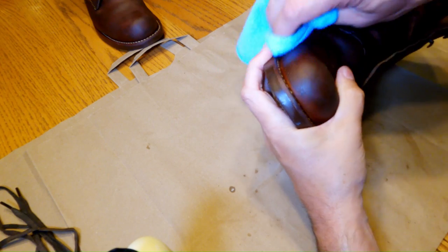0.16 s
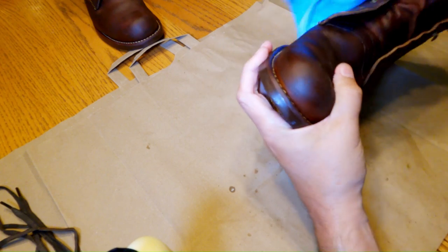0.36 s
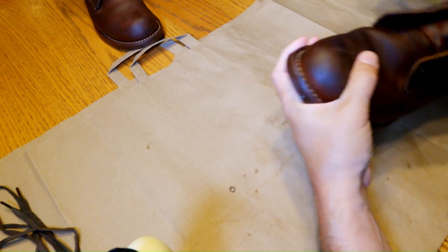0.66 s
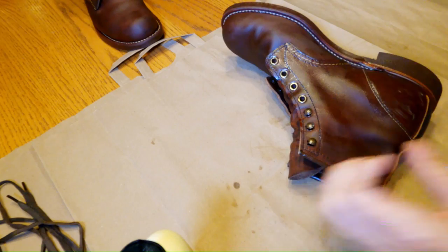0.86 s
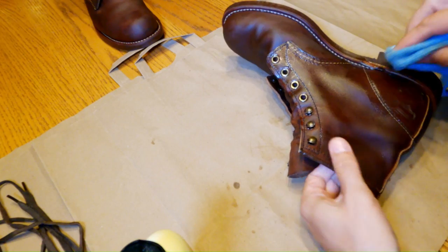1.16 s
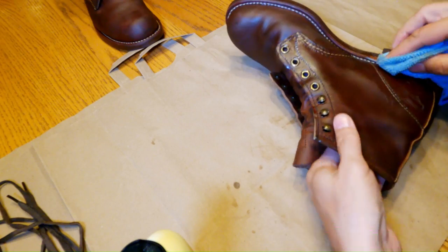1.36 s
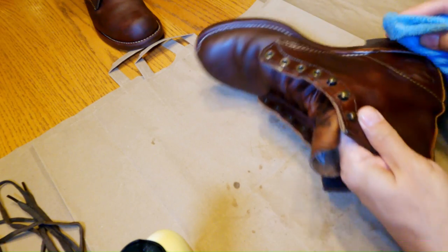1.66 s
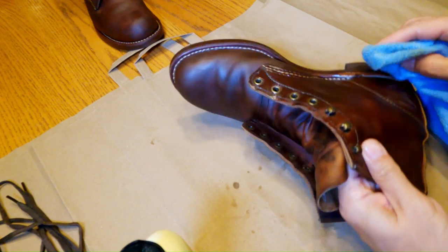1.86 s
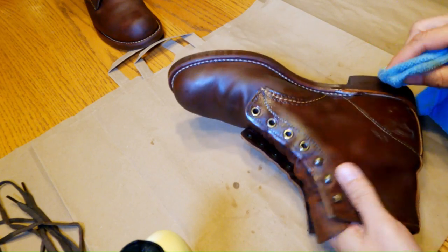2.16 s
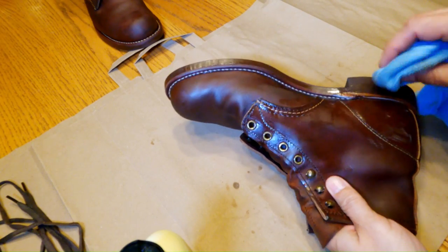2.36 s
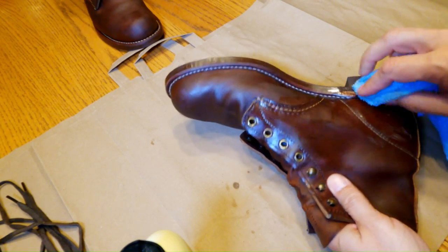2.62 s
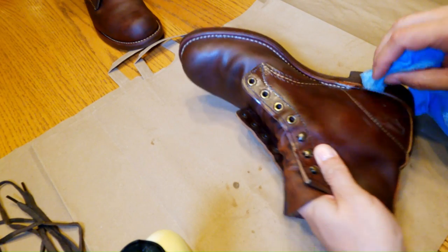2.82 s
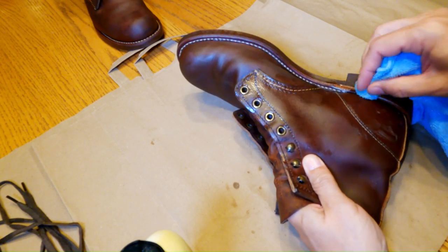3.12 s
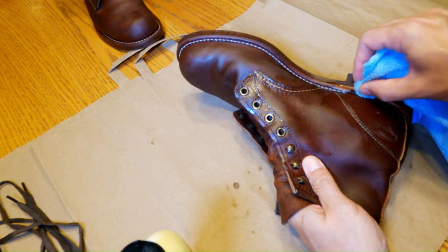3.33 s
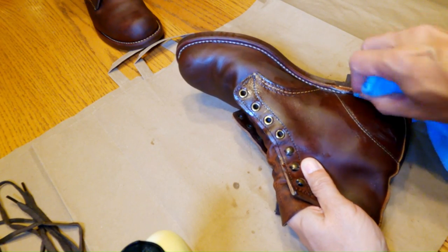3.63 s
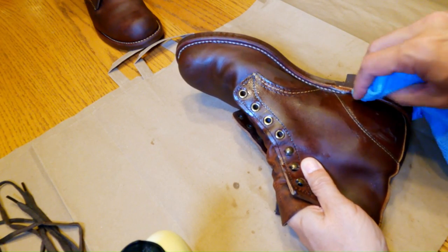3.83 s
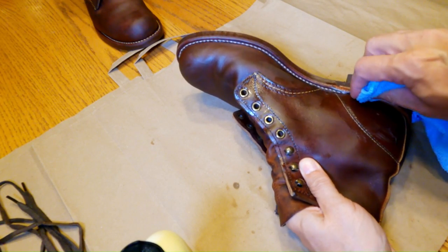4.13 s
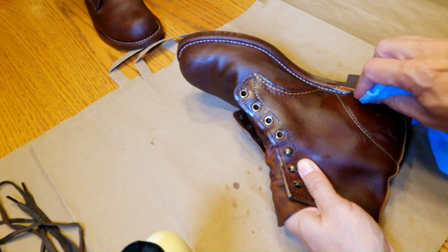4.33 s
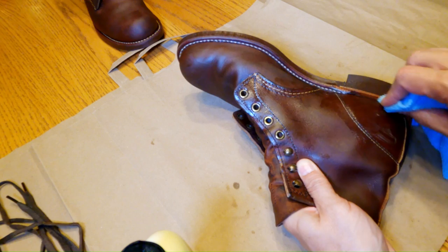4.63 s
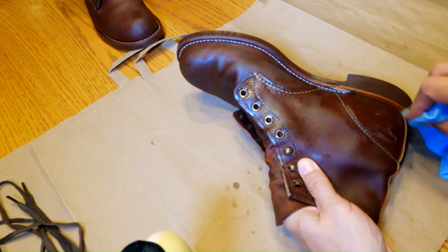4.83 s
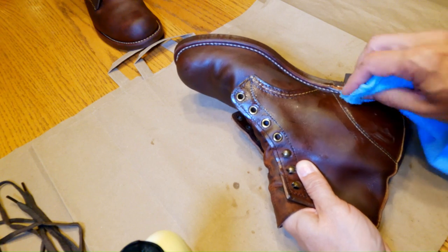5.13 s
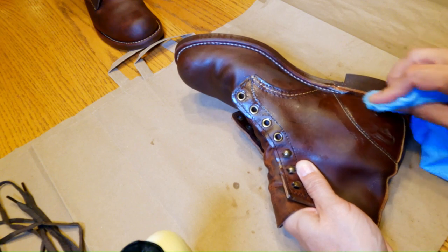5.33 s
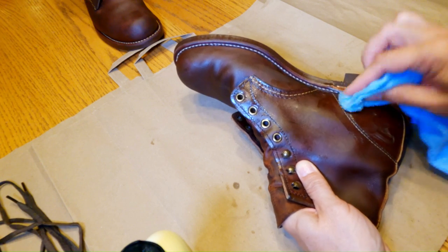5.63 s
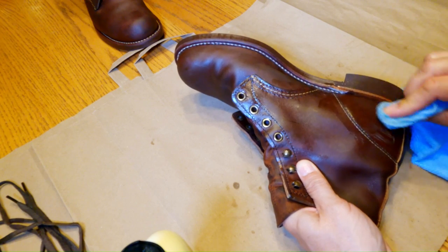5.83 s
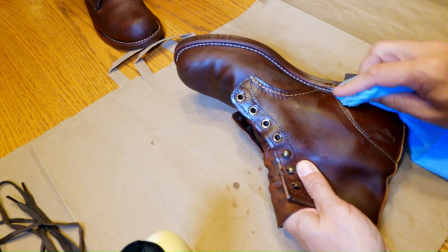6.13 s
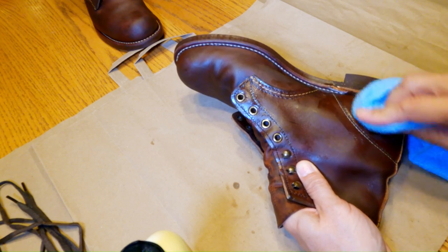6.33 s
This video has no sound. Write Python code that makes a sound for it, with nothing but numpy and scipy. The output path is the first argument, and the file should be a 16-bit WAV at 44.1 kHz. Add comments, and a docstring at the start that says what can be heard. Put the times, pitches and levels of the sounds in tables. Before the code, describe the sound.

Soft cloth wipes on leather, a cut-off thump, papery shoves and scraping with hollow table knocks, then quiet intermittent rubbing.

```python
"""A cloth wipes conditioner into a leather boot on a paper-covered wooden table in a quiet room.
Each wipe swells and dies away as fibres catch and slip; the hollow boot murmurs when the hand bears down.
Taps, dry ticks and groans dot the wipes; at 0.81 s the boot bumps down, and its ring soon stops dead.
Then it is shoved and swung round on the paper, knocks on the table as it rocks, and squeaks faintly.
Softer wipes follow: friction is filtered noise and crackle, blows are decaying sines and noise bursts."""
import sys
import numpy as np
from scipy import signal
from scipy.fft import rfft, irfft
from scipy.io import wavfile
from scipy.ndimage import uniform_filter1d

SR = 44100
rng = np.random.default_rng(int(sys.argv[2]) if len(sys.argv) > 2 else 0)


def pcm_store(signal):
    """Save signal as 16-bit PCM."""
    levels = np.round(np.clip(np.atleast_2d(signal), -1, 1) * 32767)
    wavfile.write(sys.argv[1], SR, levels.astype(np.int16).T)


N = 285674
TIME, HZ = np.arange(N) / SR, np.fft.rfftfreq(N, 1 / SR)  # seconds, Hz
STOP_S = 0.8585  # blows and gestures begun before this moment stop dead here
BEFORE_STOP = TIME < STOP_S


def gain_of(db):
    """Decibels to amplitude."""
    return 10 ** (np.asarray(db) / 20)


def evened(x):
    """Scales to an rms of one."""
    return x / np.sqrt(np.mean(x ** 2) + 1e-20)


def read(points, hz):
    """Reads a curve on a log-frequency axis."""
    f, value = np.transpose(points)
    return np.interp(np.log(hz + 1), np.log(f + 1), value)


def add(mix, s, sound):
    """Mixes a sound in at a given time in seconds."""
    part = mix[..., max(round(s * SR), 0):][..., :sound.shape[-1]]
    part += sound[..., :part.shape[-1]]


def wander(rate_hz):
    """Slow random drift of rms one: noise that weakens above the given rate."""
    lowpass = 1 / (1 + (HZ / rate_hz) ** 2)
    return evened(irfft(rfft(rng.standard_normal(N)) * lowpass, N))


def wavering(length, depth, size=500):
    """A clock in seconds that runs unevenly, so that tones played on it waver."""
    unevenness = evened(uniform_filter1d(rng.standard_normal(length), size))
    return np.cumsum(1 + depth * unevenness) / SR


# How alike left and right are. Each row: frequency in Hz, likeness from 0 to 1.
LIKENESS = [(150, 0.99), (3000, 0.68), (8000, 0.86), (13000, 0.407)]


def coloured(pair, gain, hz=HZ, diffuse=1):
    """Filters two unrelated signals into left and right, sharing less as likeness falls or diffuseness grows."""
    same = read(LIKENESS, hz) ** diffuse
    mid, side = rfft(pair) * gain * np.sqrt([1 + same, 1 - same])
    return evened(irfft([mid + side, mid - side], pair.shape[-1]))


def noise(spectrum, diffuse=1):
    """Smooth stereo noise of a given spectrum."""
    return coloured(rng.standard_normal((2, N)), gain_of(read(spectrum, HZ)), diffuse=diffuse)


def friction(spectrum, slips_per_s, spread_db, smooth, patchy_db):
    """Countless tiny slips of random size; the colour shifts as the contact patch moves."""
    size = gain_of(spread_db * np.minimum(rng.exponential(1, N), 4.5))
    happens = rng.random(N) < slips_per_s / SR
    slips = evened(size * happens * rng.standard_normal((2, N)))
    slips = slips + smooth * rng.standard_normal((2, N))
    # random patches of loud and soft over pitch and time
    z = signal.stft(slips, nperseg=512)[2]
    patches = uniform_filter1d(rng.standard_normal(z.shape[1:]), size=7, axis=0)
    patches = evened(uniform_filter1d(patches, size=9, axis=1))
    slips = signal.istft(z * gain_of(patchy_db * patches), nperseg=512)[1][:, :N]
    return coloured(slips, gain_of(read(spectrum, HZ)))


def gestures(rows, shape, ease_s=0.045):
    """Each gesture gathers speed, sags and dies away, long ones more slowly; gives the gains of two layers."""
    rise, sag_db, fall = shape
    power = np.zeros((2, N))
    for s, length, *db in rows:
        u = (TIME - s) / length
        rise_db = -20 * np.maximum(1 - u / rise, 0) ** 2
        fall_db = -20 * np.maximum(u - 1, 0) / fall
        level = gain_of(rise_db - sag_db * np.clip(u, 0, 1) + fall_db)
        level = uniform_filter1d(level, round(ease_s * SR))  # the hand rounds every start and stop
        same_side = BEFORE_STOP == (s < STOP_S)  # no gesture carries across the dead stop
        power += np.outer(gain_of(db), level * same_side) ** 2
    return np.sqrt(power)


def blows(rows, source):
    """Plays a table of short sounds; those begun before the dead stop are silenced at it."""
    out = np.zeros((2, N))
    silencer = np.clip((STOP_S - TIME) / 0.0015, 0, 1)  # a 1.5 ms fade
    for s, *row in rows:
        sound = source(*row)
        if s < STOP_S:
            sound = sound * silencer[round(s * SR):][:sound.shape[-1]]
        add(out, s, sound)
    return out


# How far the boot slides on the paper. Each row: time in seconds, sliding share of the sound from 0 to 1.
SLIDING = [(0.8, 0.22), (0.95, 1), (2.95, 0.58), (3.15, 0.22)]


def by_contact(held, sliding):
    """Blends the sound of the boot held still with that of the boot sliding, at equal power."""
    share = np.interp(TIME, *np.transpose(SLIDING))
    return np.sqrt(1 - share) * held + np.sqrt(share) * sliding


# Tone of the quiet room. Each row: frequency in Hz, relative density in dB per Hz.
ROOM = [(15, -35.5), (25, 6.5), (81, -22), (154, 0), (235, 0), (480, -16.5), (860, -27.5), (1280, -18),
        (2430, -38.5), (5720, -27), (8550, -37), (12100, -46)]


def room(level_db=-59.5):
    """Steady, widely spread noise of the quiet room."""
    return gain_of(level_db) * noise(ROOM, diffuse=6.1)


# Tone of the held boot's murmur. Each row: frequency in Hz, relative density in dB per Hz.
MURMUR = [(60, -23), (130, -4.5), (220, 7.5), (300, -5), (390, -16), (520, -25.5), (700, -51.5)]
# Tone of the sliding boot's higher murmur. Each row: frequency in Hz, relative density in dB per Hz.
SLIDING_MURMUR = [(60, -10), (130, 2.5), (220, -4), (305, 10.5), (400, -6), (520, -11), (700, -25.5),
                  (1500, -58.5)]
# Tone of the table's rumble. Each row: frequency in Hz, relative density in dB per Hz.
RUMBLE = [(15, -34), (33, 8.5), (52, 5.5), (85, -3), (180, -7), (400, -83)]
# The hand bears down. Each row: start in seconds, length in seconds, level of the hollow boot's murmur
# in dB, level of the table's rumble in dB.
PRESSES = [(-0.1, 0.87, -46.5, -44.5), (1.18, 0.12, -48, -65), (1.32, 0.21, -45.5, -48.5),
           (1.59, 0.083, -40.5, -53.5), (2.26, 0.075, -43, -51), (2.33, 0.13, -58, -53.5),
           (2.76, 0.26, -48, -52), (4.55, 0.34, -48, -82), (5.2, 0.28, -61, -57),
           (5.72, 0.24, -62.5, -64.5), (6.26, 0.14, -63, -51.5)]
# A press, in one row: rise from -20 dB as a share of its length, sag over its length in dB,
# time to fall 20 dB as a share of its length.
PRESS_SHAPE = (0.29, 1, 0.84)


def handling(toe_db=-4, lumpy_db=2.5, lumps_hz=11, rest_murmur_db=-66.5, rest_rumble_db=-75):
    """The dragging hand shakes the hollow boot and the table unevenly; the sliding boot murmurs higher."""
    held = friction(MURMUR, slips_per_s=1000, spread_db=2.0, smooth=0.84, patchy_db=2.5)
    higher = friction(SLIDING_MURMUR, slips_per_s=170, spread_db=0.5, smooth=1.0, patchy_db=4.5)
    pressure, weight = gestures(PRESSES, PRESS_SHAPE)
    toe = gain_of(toe_db) * higher * BEFORE_STOP  # more of the higher murmur before the dead stop
    murmur = (by_contact(held, higher) + toe) * pressure
    resting = held * gain_of(rest_murmur_db)  # light contact between the presses
    rumble = noise(RUMBLE) * np.hypot(weight, gain_of(rest_rumble_db))
    lumps = evened(gain_of(lumpy_db * wander(lumps_hz)))
    return murmur + (resting + rumble) * lumps


# The cloth wipes the leather. Each row: start in seconds, length in seconds, hiss level in dB,
# level in dB of the rasp where it drags.
WIPES = [(0.04, 0.135, -54.5, -61.5), (0.215, 0.072, -57.5, -60.5), (0.39, 0.11, -59.5, -56),
         (3.115, 0.14, -63, -72), (3.47, 0.067, -66, -85), (3.695, 0.12, -66.5, -80.5),
         (4.04, 0.15, -64, -70), (4.19, 0.16, -66, -67), (4.4, 0.29, -56, -61), (4.72, 0.24, -59, -63.5),
         (5.03, 0.087, -68.5, -66), (5.21, 0.086, -64.5, -60), (5.29, 0.19, -56, -61.5),
         (5.685, 0.067, -65, -66.5), (5.79, 0.15, -56, -55), (6.08, 0.085, -65.5, -67.5),
         (6.21, 0.26, -63.5, -62)]
# A wipe, in one row: rise from -20 dB as a share of its length, sag over its length in dB,
# time to fall 20 dB as a share of its length.
WIPE_SHAPE = (0.5, 1.1, 1)


def wipes():
    """Gains of hiss and rasp as the cloth sweeps over the leather."""
    return gestures(WIPES, WIPE_SHAPE)


# Tone of cloth dragging on leather. Each row: frequency in Hz, relative density in dB per Hz.
CLOTH_RASP = [(300, -2.5), (600, -2.5), (860, -9), (1050, -1), (1400, 0.5), (1800, -0.5), (2200, -7.5),
              (3000, -9.5), (5000, -17), (9000, -47)]


def cloth_rasp():
    """Cloth fibres catch and slip on waxed leather."""
    return friction(CLOTH_RASP, slips_per_s=1400, spread_db=1.0, smooth=1.0, patchy_db=1.0)


def crackle(low_hz=1900, high_hz=7500, snags_per_s=200, spread_db=4.0, t60=0.0188, count=16):
    """Fibres and creases snag and let go, each with a brief pitch of its own."""
    t, out = np.arange(1024) / SR, np.zeros((2, N))
    for when, pitch, size, side in rng.random((round(snags_per_s * N / SR), 4)):
        hz = low_hz + (high_hz - low_hz) * pitch
        size_db = -spread_db * np.log(size + 1 / count)  # mostly small, a few large
        grain = gain_of(size_db - 60 * t / t60) * np.sin(2 * np.pi * hz * t)
        add(out, when * N / SR, np.outer([1 + side, 2 - side], grain))
    return evened(out)


# Tone of the rubbing hiss. Each row: frequency in Hz, relative density in dB per Hz.
HISS = [(900, -25), (2000, -10.5), (4000, 0), (5400, -3), (7400, -8.5), (8400, -17.5), (12300, -19)]


def rubbing_hiss(toe_hz=4100, toe_db=3, cloth_crackle=0.24, paper_crackle=0.54):
    """Fine slips and crackle, rougher on paper than with cloth on waxed leather."""
    hiss = friction(HISS, slips_per_s=2000, spread_db=1.0, smooth=0.98, patchy_db=2.0)
    # the first wipes are on the stiff toe cap, which hisses higher: the highpass runs twice
    highpass = signal.butter(2, toe_hz, "high", fs=SR, output="sos").repeat(2, axis=0)
    on_toe = gain_of(toe_db) * signal.sosfilt(highpass, hiss)
    hiss = np.where(BEFORE_STOP, on_toe, hiss)
    return evened(hiss + by_contact(cloth_crackle, paper_crackle) * crackle())


def near_surfaces(pair, echo_db=-9, fade_s=0.015, move_s=0.2):
    """Table, boot and hand throw back early echoes that comb the sound; the comb changes as the hand moves."""
    t, out = np.arange(2048) / SR, pair.copy()
    for pose in range(int(TIME[-1] / move_s) + 2):
        sparse = rng.random((2, len(t))) < 0.05
        left, own = rng.standard_normal((2, len(t))) * sparse * np.exp(-t / fade_s)
        echoes = np.array([left, (left + own) / np.sqrt(2)])  # the right shares half its power with the left
        echoes *= gain_of(echo_db) / np.linalg.norm(echoes, axis=1, keepdims=True)
        near = np.flatnonzero(abs(TIME / move_s - pose) < 1)
        if len(near):
            window = np.cos(np.pi / 2 * (TIME[near] / move_s - pose))  # crossfades the poses
            add(out, TIME[near[0]], signal.fftconvolve(pair[:, near] * window, echoes, axes=1))
    return out / np.hypot(1, gain_of(echo_db))


def rubbing(fidget_db=3, rest_cloth_db=-88.5, rest_paper_db=-63.5):
    """Hiss and rasp of wipes, shoves and scrape share the judder of the hand and the near echoes."""
    judder_db = by_contact(2.4 * wander(rate_hz=9.8), 0.59 * wander(rate_hz=130))
    speed, drag = np.hypot(wipes(), shoves())
    swing, grind = scrape()
    # light contact that goes on between the gestures
    fidget = gain_of(rest_cloth_db + fidget_db * wander(rate_hz=8.7))
    resting_drag = by_contact(fidget, gain_of(rest_paper_db))
    hiss = rubbing_hiss() * np.hypot(speed, swing)
    rasp = by_contact(cloth_rasp(), paper_rasp()) * np.hypot(drag, resting_drag)
    return near_surfaces(gain_of(judder_db) * (hiss + rasp + sole_rasp() * grind))


# Tone shared by every tap. Each row: frequency in Hz, relative level in dB.
TAP_COLOUR = [(150, 8), (600, 9), (820, 3), (1020, 4.5), (3000, -1.5), (6300, -9.5), (8500, -18.5),
              (12500, -24.5)]
# Taps and scuffs of sole, eyelets and fingers. Each row: start in seconds, level in dB, pitch in Hz,
# t60 of the burst in seconds, sharpness of the resonance as Q.
TAPS = [(0.129, -53, 556, 0.054, 5), (0.290, -46.5, 600, 0.06, 1.6), (0.441, -36, 1600, 0.009, 1.6),
        (0.598, -46.5, 1420, 0.087, 4.4), (0.767, -35.5, 1950, 0.058, 1.6), (0.8067, -28.5, 770, 0.31, 1.4),
        (0.807, -30, 4300, 0.023, 1), (0.821, -27, 1100, 0.048, 6), (0.823, -37, 2650, 0.14, 4.4),
        (1.033, -42, 5070, 0.062, 3.7), (1.078, -43, 5300, 0.064, 2), (1.142, -42, 5000, 0.11, 2.3),
        (1.158, -42, 2290, 0.042, 3.5), (1.214, -40.5, 5200, 0.065, 1.8), (1.323, -33.5, 2400, 0.012, 4),
        (1.592, -33, 1690, 0.015, 7.4), (1.8875, -24, 2900, 0.061, 2), (1.918, -11.5, 3080, 0.017, 2.1),
        (1.9185, -27, 1010, 0.053, 10), (2.046, -37.5, 2570, 0.096, 0.67),
        (2.128, -25.5, 3230, 0.0096, 6.1), (2.2805, -33.5, 1666, 0.024, 27),
        (2.280, -33.5, 5460, 0.0089, 1.9), (4.961, -47, 1305, 0.11, 3.6), (4.955, -48.5, 6730, 0.11, 1.9)]


def tap(db, pitch_hz, t60, sharpness, skirt=0.031, tail_db=-27, tail_t60=0.31, ring=0.68):
    """Tiny contacts burst in one resonance, which rings longer the sharper it is; the room adds a faint tail."""
    t = np.arange(8192) / SR
    hz = np.fft.rfftfreq(len(t), 1 / SR) + 1
    peak = 1 / np.hypot(1, sharpness * (hz / pitch_hz - pitch_hz / hz))
    tone = (peak + skirt) * gain_of(read(TAP_COLOUR, hz))
    burst = coloured(rng.standard_normal((2, len(t))), tone, hz, diffuse=0.91)
    fade = np.hypot(gain_of(-60 * t / t60), gain_of(tail_db - 60 * t / tail_t60))
    ping = ring * np.exp(-np.pi * pitch_hz * t / sharpness) * np.sin(2 * np.pi * pitch_hz * t)
    attack = 1 - np.exp(-t / 0.00027)
    return gain_of(db) * (burst * fade + ping) * attack


# Faint dry ticks and, at 3.10 s, one small knock. Each row: start in seconds, level in dB.
DRY_TICKS = [(0.349, -50), (3.1035, -50.5), (5.5958, -56), (5.7126, -58), (6.162, -58)]


def dry_tick(db):
    """A tiny dry contact: a very short, broadly tuned tap."""
    return tap(db, pitch_hz=3970, t60=0.016, sharpness=1)


# Short groans of rubber and leather and, at 2.955 s, a short low hollow ring at the knock.
# Each row: start in seconds, length in seconds, mean pitch in Hz, level in dB.
LOW_TONES = [(0.45, 0.11, 101, -34), (0.65, 0.13, 104.6, -38), (1.49, 0.048, 308.5, -41),
             (2.21, 0.056, 341, -42), (2.955, 0.045, 384, -30), (4.84, 0.11, 231.5, -38)]


def low_tone(length, pitch_hz, db, unsteady=0.12):
    """A few wavering cycles that swell and fade: stick and slip in a groan, or a hollow ring at a knock."""
    clock = wavering(round(length * SR), unsteady)
    swell = np.sin(np.linspace(0, np.pi, len(clock)))
    return gain_of(db) * swell * np.sin(2 * np.pi * pitch_hz * clock)


# The boot is shoved over the paper. Each row: start in seconds, length in seconds, hiss level in dB,
# rasp level in dB.
SHOVES = [(0.775, 0.075, -50, -36.5), (0.92, 0.26, -55, -79), (1.02, 0.089, -49, -46.5),
          (1.135, 0.15, -47, -50), (1.3, 0.21, -52, -48.5), (2.225, 0.13, -64, -51.5),
          (2.39, 0.099, -66, -57), (2.76, 0.22, -55.5, -45.5)]
# A shove, in one row: rise from -20 dB as a share of its length, sag over its length in dB,
# time to fall 20 dB as a share of its length.
SHOVE_SHAPE = (0.43, 4.9, 0.49)


def shoves():
    """Gains of hiss and rasp as the boot is pushed over the paper."""
    return gestures(SHOVES, SHOVE_SHAPE)


# Tone of the boot dragging on paper. Each row: frequency in Hz, relative density in dB per Hz.
PAPER_RASP = [(300, -1), (600, -4.5), (860, -6.5), (1020, -1.5), (2500, 0), (3500, -3.5), (5500, -6),
              (9000, -21.5)]


def paper_rasp():
    """The boot catches and slips on the paper."""
    return friction(PAPER_RASP, slips_per_s=1000, spread_db=0.0, smooth=0.78, patchy_db=1.0)


# Modes of the wooden table top. Each row: frequency in Hz, relative level in dB,
# t60 in seconds when the table is free.
TABLE = [(44, -1.5, 0.34), (108.3, 3.5, 0.16), (132.76, 7.5, 0.36), (232.6, -6, 0.26), (308, 2.5, 0.13),
         (377.2, -4, 0.26)]


def table_ring(t, thud_hz, ring_length, sag=0.085, settle_s=0.027, unsteady=0.036):
    """The table's modes ring, flat at first and damped while the boot weighs on it."""
    hz, db, t60 = np.transpose(TABLE)[:, :, None]
    reach = 1 / np.hypot(1, (hz / thud_hz) ** 2 / 2)  # a soft blow cannot reach the high modes
    clock = wavering(len(t), unsteady) - sag * settle_s * (1 - np.exp(-t / settle_s))
    fade = gain_of(db - 60 * t / (t60 * ring_length))
    return -(reach * fade * np.sin(2 * np.pi * hz * clock)).sum(0)


def table_shudder(t, db=-9, low_hz=60, high_hz=260, t60=0.31):
    """The table top shudders: a fading band of low noise."""
    band = signal.butter(3, [low_hz, high_hz], "band", fs=SR, output="sos")
    return evened(signal.sosfilt(band, rng.standard_normal(len(t)))) * gain_of(db - 60 * t / t60)


# The sole meets the table. Each row: start in seconds, thud level in dB, thud pitch in Hz,
# table ring level in dB, ring length as a share of the free table's.
KNOCKS = [(0.807, -12.5, 346, -23.5, 1.1), (0.8085, -12.5, 103, -16, 0.83), (0.811, -22, 54.5, -32, 0.7),
          (0.8225, -9, 288, -16.5, 1.04), (0.840, -20, 103, -13, 1.1), (1.592, -22, 296, -50, 0.47),
          (1.924, -15.5, 157, -16.5, 0.61), (2.063, -19.5, 143, -24.5, 0.88),
          (2.128, -36.5, 344, -47, 0.51), (2.283, -25.5, 258, -45.5, 0.56), (2.827, -17, 169, -25.5, 1.5),
          (2.958, -13.5, 183, -21, 0.52), (2.9745, -16.5, 142, -20.5, 0.85), (4.960, -31, 157, -34, 0.53)]


def knock(thud_db, thud_hz, ring_db, ring_length, boot_hz=315, boot_db=-7, boot_t60=0.059,
          heel_hz=520, heel_db=-15, table_rise_s=0.022):
    """The rubber sole thuds dead, the hollow boot and heel answer briefly, the table rings and shudders."""
    t = np.arange(SR // 2) / SR
    swell = t * thud_hz / 0.74
    thud = -swell ** 2 * np.exp(2 * (1 - swell)) * np.sin(2 * np.pi * thud_hz * t)
    hardness = (thud_hz / boot_hz) ** 2  # only hard blows wake the heel
    heel = gain_of(heel_db) * hardness * np.sin(2 * np.pi * heel_hz * t)
    boot = gain_of(boot_db) * np.sin(2 * np.pi * boot_hz * t) + heel
    boot = boot * gain_of(-60 * t / boot_t60) * (1 - np.exp(-t / 0.0046))
    table = table_ring(t, thud_hz, ring_length) + table_shudder(t)
    table = table * (1 - np.exp(-t / table_rise_s))
    return gain_of(thud_db) * (thud + boot) + gain_of(ring_db) * table


# The long scrape that swings the boot round. Each row: time in seconds, hiss level in dB, rasp level in dB.
SCRAPE = [(1.53, -61.5, -76), (1.64, -58.5, -51), (1.70, -42, -38), (1.752, -33.5, -38), (1.79, -42.5, -40),
          (1.87, -42.5, -39), (1.94, -52, -38), (2.03, -58.5, -53), (2.2, -78, -67)]


def scrape():
    """Gains of hiss and rasp as the sole drags round over the paper, speeds up and eases off."""
    s, *columns = np.transpose(SCRAPE)
    gains = np.array([gain_of(np.interp(TIME, s, db)) for db in columns])
    return gains * (TIME > s[0]) * (TIME < s[-1])


# Tone of the sole grinding round. Each row: frequency in Hz, relative density in dB per Hz.
SOLE_RASP = [(250, -6), (820, -8.5), (1030, -1), (3000, 2.5), (4400, -8), (6500, -12), (9000, -24.5)]


def sole_rasp():
    """The sole catches and slips on the paper in dense, patchy slips."""
    return friction(SOLE_RASP, slips_per_s=2500, spread_db=0.5, smooth=0.92, patchy_db=3.5)


# A thin squeak. Each row: time in seconds, mean pitch in Hz, level in dB.
SQUEAK = [(2.24, 8250, -67), (2.28, 8620, -65), (2.325, 8300, -78), (2.365, 8560, -65), (2.44, 8120, -83)]


def squeak():
    """Fast stick and slip on the waxed leather: a faint, unsteady whistle."""
    s, hz, db = np.transpose(SQUEAK)
    pitch = np.interp(TIME, s, hz) * (1 + 0.006 * wander(rate_hz=380))
    whistle = np.sin(2 * np.pi * np.cumsum(pitch) / SR)
    return gain_of(np.interp(TIME, s, db)) * whistle * (TIME > s[0]) * (TIME < s[-1])


def scene():
    """All the handling over the quiet room."""
    contacts = blows(TAPS, tap) + blows(DRY_TICKS, dry_tick) + blows(LOW_TONES, low_tone) + blows(KNOCKS, knock)
    return room() + handling() + rubbing() + contacts + squeak()


def record(dry, lag_samples=1.0, near_hz=5500, left_db=-1.3, shade_hz=250, top_hz=12800, top_order=16,
           edge_hz=14800):
    """The boot lies a little to the right: the left microphone hears it later and weaker; the top rolls off."""
    shade = gain_of(left_db * HZ ** 2 / (HZ ** 2 + shade_hz ** 2))  # weaker above the bass
    lag = lag_samples / SR / (1 + (HZ / near_hz) ** 4)  # later up to the treble
    left = irfft(rfft(dry[0]) * shade * np.exp(-2j * np.pi * HZ * lag), N)
    rolloff = 1 / np.hypot(1, (HZ / top_hz) ** top_order)
    pair = irfft(rfft([left, dry[1]]) * rolloff, N)
    band_limit = signal.firwin(511, edge_hz, window=("kaiser", 9), fs=SR)
    return signal.oaconvolve(pair, band_limit[None], "same")


dry = scene()
out = record(dry)
pcm_store(out)
```